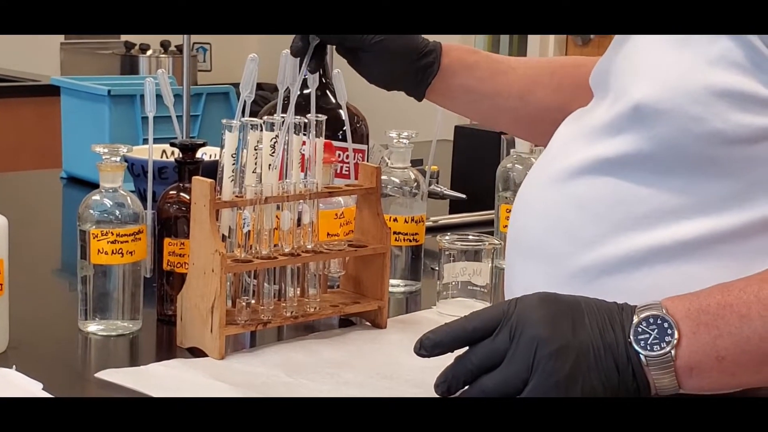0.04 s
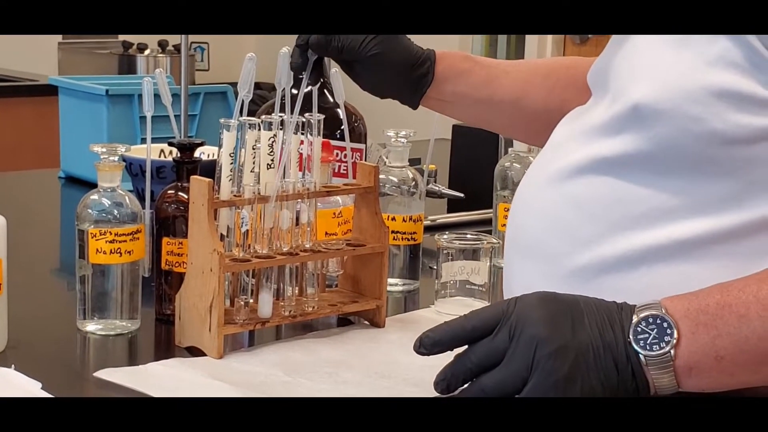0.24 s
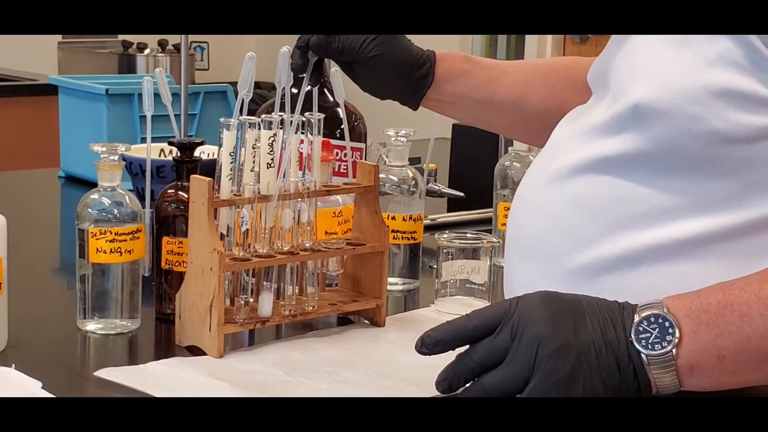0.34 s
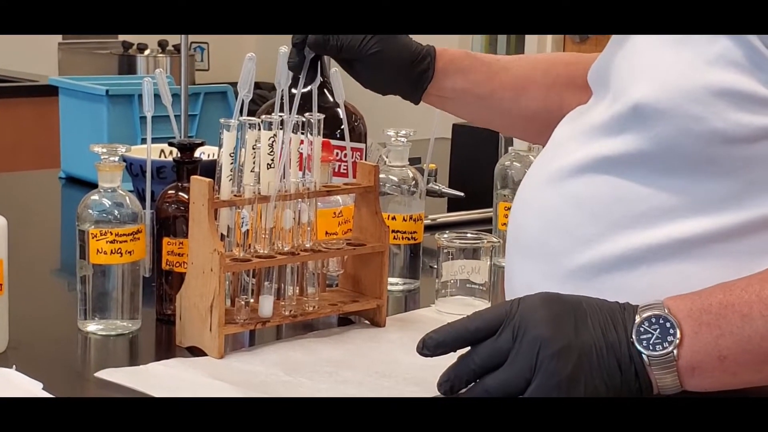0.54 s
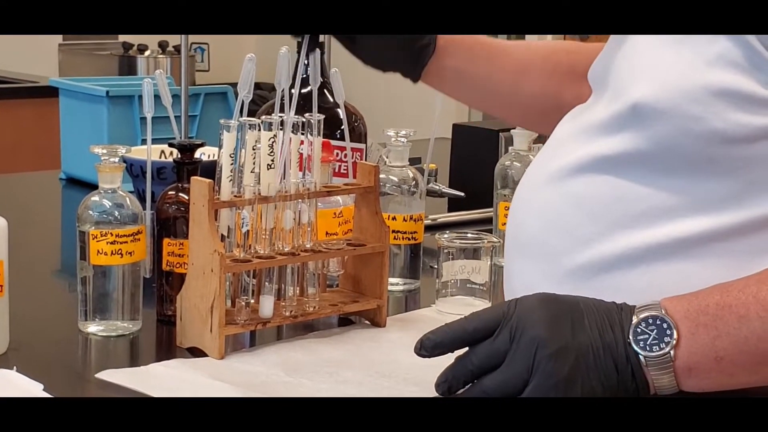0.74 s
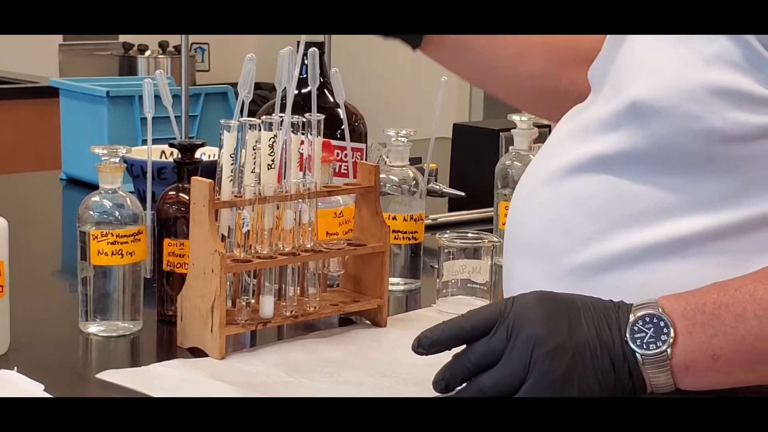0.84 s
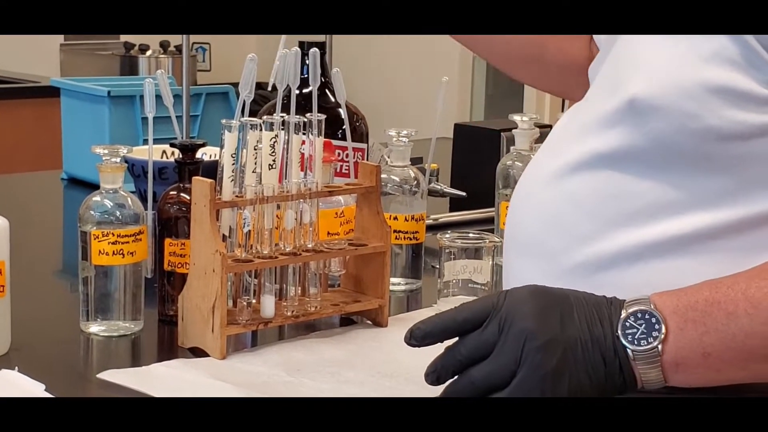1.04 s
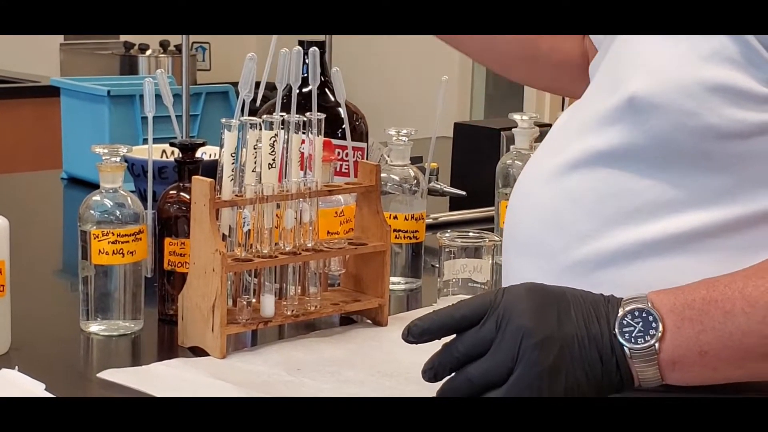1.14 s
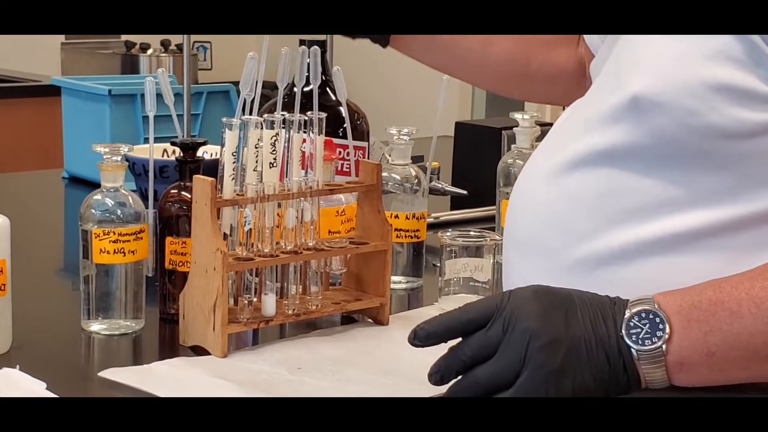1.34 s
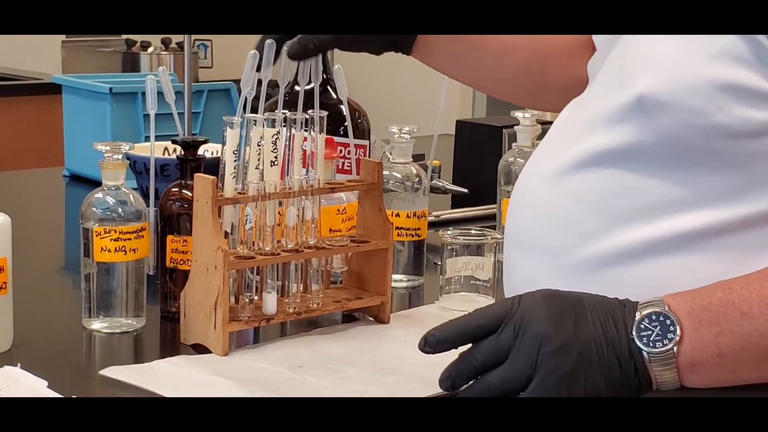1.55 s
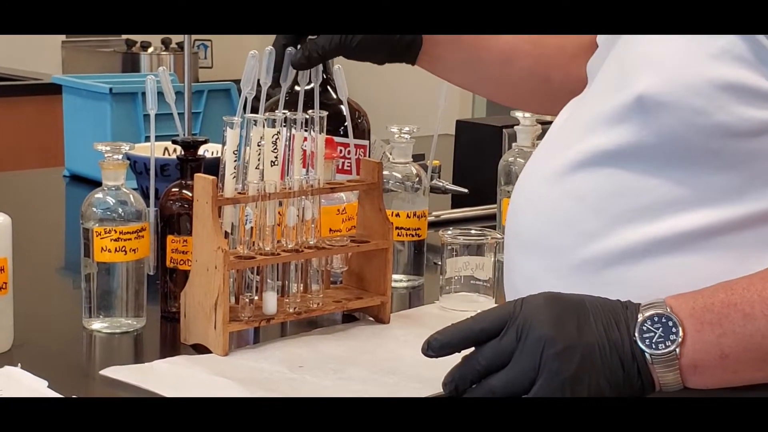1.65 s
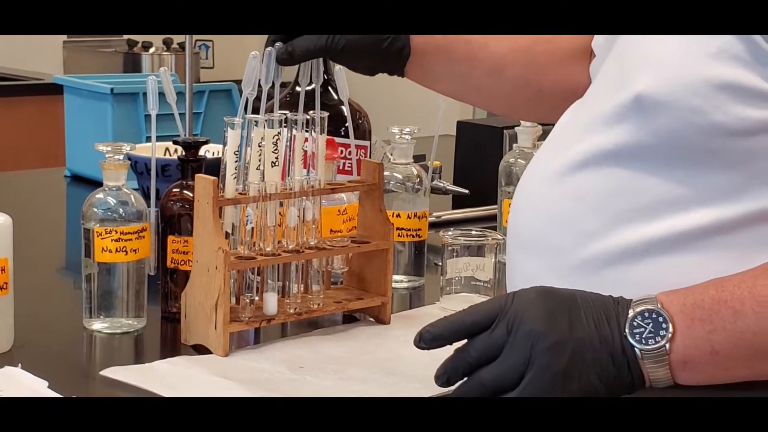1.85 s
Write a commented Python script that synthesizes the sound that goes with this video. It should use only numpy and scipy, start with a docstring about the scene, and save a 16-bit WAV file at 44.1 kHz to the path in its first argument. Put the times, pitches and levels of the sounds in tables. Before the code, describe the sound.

Glass test tubes clink brightly at about 0.3 seconds, just after a plastic pipette ticks on a rim. Faint brushing and taps follow from 0.7 seconds, with a clearer tap near 0.95. Around 1.4 the pipette rattles down a tube, landing at 1.5 with a duller knock against the wooden rack. Low ventilation rumble and faint hiss continue throughout in a small, hard room.

```python
"""A lab bench in a small hard room, over a low ventilation rumble and a faint hiss.
Plastic pipettes are moved between glass test tubes in a wooden rack. One is let go: its stem ticks
on the rim, then two tubes clink brightly. Lifting one out brushes and taps a tube; it rattles down
into another and knocks on the bottom. Each contact is a set of ringing modes plus a crack of noise;
the slides are stick-slip friction on glass."""
import sys
import numpy as np
from scipy import signal
from scipy.fft import rfft, irfft
from scipy.io import wavfile
from scipy.ndimage import uniform_filter1d

SR = 44100
rng = np.random.default_rng(int(sys.argv[2]) if len(sys.argv) > 2 else 0)


def wav_out(sig):
    """Save sig, one row per channel (or a flat mono array), as 16-bit PCM at SR to the path in sys.argv[1]."""
    wavfile.write(sys.argv[1], SR, np.round(np.clip(np.atleast_2d(sig).T, -1, 1) * 32767).astype(np.int16))


N = 83790

# contact noise: bright on glass, dull for a knock, sharp at first touch (frequency [Hz], level [dB])
GLASS_CRACK = [(300, -7), (1200, -12.5), (2500, -11), (3400, -3), (4100, 5.5), (4900, -2.5), (6000, 0),
               (8000, -34.5), (11000, -11.5), (16000, -11)]
KNOCK_CRACK = [(300, 8), (850, 8), (1800, 0), (3200, -10), (4500, -3.5), (6000, -8.5), (9000, -9.5),
               (13500, -18), (16000, -21)]
SNAP = [(1500, -34), (5000, -3), (16000, 0)]


def undb(db):
    """Decibels to gain."""
    return 10 ** (np.asarray(db) / 20)


def curve(points, hz):
    """Read (frequency [Hz], value) points on a log-frequency axis."""
    p = np.array(points, float)
    return np.interp(np.log(np.maximum(hz, 1)), np.log(p[:, 0]), p[:, 1])


def colour(x, points, power=1):
    """EQ by a (frequency [Hz], level [dB]) curve; power scales its depth."""
    gain = undb(curve(points, np.fft.rfftfreq(2 * N, 1 / SR))) ** power
    return irfft(rfft(x, 2 * N) * gain)[..., :N]


def noise(points):
    """Coloured noise of rms 1."""
    x = colour(rng.standard_normal(N), points)
    return x / x.std()


def fade(t, t60):
    """Exponential decay, 60 dB in t60 seconds."""
    return np.exp(-np.log(1000) * t / t60)


def hiss():
    """Each microphone port adds a faint hiss of its own colour."""
    # hiss spectra (frequency [Hz], level [dB])
    left = [(3000, -21), (5900, -7), (6500, 6.5), (7400, -4.5), (9000, -10.5), (16000, -12)]
    right = [(3000, -20), (5200, -5.5), (8500, -7), (16000, -11.5)]
    return np.array([undb(-74) * noise(left), undb(-78.5) * noise(right)])


def ventilation():
    """Duct rumble that swells a little, centred in the bass, with a hum and a faint whine."""
    # air spectrum, its side-to-mid ratio, the band that swells, steady tones (frequency [Hz], level [dB])
    spectrum = [(20, -30.5), (40, -8), (58, 0), (110, -6.5), (145, -1.5), (180, -1), (225, -11),
                (340, -6.5), (520, -18.5), (730, -22), (950, -20), (1400, -27.5), (2000, -28.5),
                (3000, -38.5), (6500, -48.5), (10000, -60), (16000, -64)]
    width = [(60, -15), (150, -16.5), (300, -10), (600, -3.5), (1200, 3.5), (4000, -1.5)]
    rumble_band = [(200, 0), (400, -30)]
    tones = [(62, -59), (139, -61), (1600, -76.5)]
    t, step = np.arange(N) / SR, int(SR / 9)  # nine swell steps a second
    mid, side = noise(spectrum), colour(noise(spectrum), width)
    air = np.array([mid + side, mid - side])
    swell_db = uniform_filter1d(np.repeat(rng.standard_normal(N // step + 1), step), step)[:N]
    air += colour(air, rumble_band) * (undb(swell_db) - 1)
    hum = sum(undb(db) * np.sqrt(2) * np.sin(2 * np.pi * (hz * t + rng.random())) for hz, db in tones)
    return undb(-47.5) * air + hum


def room(x):
    """One clear echo from a hard surface, then a diffuse tail whose treble dies first."""
    # reverb decay (frequency [Hz], t60 [s])
    decays = [(500, .5), (4000, .5), (10000, .26), (15000, .19)]
    build_s, echo_s = 0.0027, 0.012
    t, hz = np.arange(N) / SR, np.fft.rfftfreq(N, 1 / SR)
    spectrum, tail = rfft(rng.standard_normal((2, N))), 0
    for centre_hz, t60 in decays:
        band = curve([(f, f == centre_hz) for f, _ in decays], hz)
        env = fade(t, t60) * (1 - np.exp(-t / build_s))
        tail += irfft(spectrum * band, N) * env / np.sqrt(np.sum(env ** 2))
    echo = np.pad(x, ((0, 0), (int(echo_s * SR), 0)))[:, :N]
    wet = undb(0.5) * signal.fftconvolve(x, tail, axes=1)[:, :N] + undb(-9.5) * echo
    return x + colour(wet, [(5000, 0.0047), (12000, -3.5)])


def slide(resonances, start_s, end_s, db):
    """Dense stick-slip catches excite the damped resonances of the glass."""
    slips_per_s, scatter_db = 450, 4
    t, hz = np.arange(N) / SR, np.fft.rfftfreq(N, 1 / SR)
    catches = rng.random(N) < slips_per_s / SR
    slips = catches * undb(scatter_db * rng.standard_normal(N)) * rng.standard_normal((2, N))
    sliding = (t > start_s) & (t < end_s)
    body = sum(undb(peak_db) / (1 + 2j * (hz - f) / width) ** 2 for f, width, peak_db in resonances)
    scrape = irfft(rfft(slips * sliding) * body, N)
    return undb(db) * scrape / scrape[:, sliding].std()


def strike(hits, modes):
    """Each contact sets the modes ringing; its brightness lifts or dulls those above 7 kHz."""
    attack_s, stereo_spread_rad = 0.00019, 0.9
    out, t = np.zeros((2, N)), np.arange(SR // 2) / SR
    attack = 1 - np.exp(-t / attack_s)
    for time_s, db, bright_db in hits:
        start, ring = int(time_s * SR), 0
        for hz, mode_db, t60 in modes:
            phase = rng.uniform(0, 2 * np.pi) + stereo_spread_rad * rng.standard_normal((2, 1))
            gain = undb(db + mode_db + curve([(7000, 0.015), (14000, bright_db)], hz))
            ring += gain * fade(t, t60) * np.sin(2 * np.pi * hz * t + phase)
        out[:, start:start + len(t)] += (ring * attack)[:, :N - start]
    return out


def crack(hits, spectrum, db, t60):
    """A short, wide burst of contact noise at each hit."""
    t = np.arange(N) / SR
    env = sum(undb(hit_db + db) * (t >= at) * fade(np.abs(t - at), t60) for at, hit_db, _ in hits)
    return env * np.array([noise(spectrum), noise(spectrum)])


def taps(tube_modes):
    """The stem brushes and taps a tube on its way out."""
    # light taps (time [s], level [dB], brightness [dB])
    hits = [(.6591, -58.5, -3), (.7384, -61, -5), (.7583, -65, -7), (.782, -58.5, -11),
            (.9454, -45.5, -1.5), (.971, -55, -3), (.9955, -62, -14)]
    # resonances of the brushed glass (frequency [Hz], width [Hz], level [dB])
    body = [(3820, 740, -6), (10200, 630, -6), (14300, 330, -11)]
    tapping = strike(hits, tube_modes) + crack(hits, GLASS_CRACK, db=-8, t60=0.013)
    return tapping + slide(body, start_s=.737, end_s=.795, db=-68.5)


def rattle():
    """The stem scrapes and chatters down the wall of another tube."""
    # wall contacts (time [s], level [dB], brightness [dB])
    hits = [(1.2492, -65.5, -8), (1.3575, -51.5, -2), (1.3689, -54, -6), (1.3829, -52, -10),
            (1.3905, -52.5, -8), (1.4012, -46.5, -8), (1.433, -59, 1)]
    # ring of that tube (frequency [Hz], level [dB], t60 [s])
    modes = [(4003, 0, 0.028), (9350, -20, 0.03), (12900, -11, .025), (15350, -8, .025)]
    # resonances of the scraped glass (frequency [Hz], width [Hz], level [dB])
    body = [(3200, 1600, 5.5), (4130, 430, -4), (9300, 1800, -3), (15200, 790, -2)]
    chatter = strike(hits, modes) + crack(hits, GLASS_CRACK, db=-9.5, t60=0.018)
    return chatter + slide(body, start_s=1.357, end_s=1.445, db=-69)


def pipette_tick():
    """The plastic stem snaps against the rim as it is let go."""
    # rim contact (time [s], level [dB], brightness [dB])
    hits = [(.2402, -47, 1)]
    # ring of the plastic (frequency [Hz], level [dB], t60 [s])
    modes = [(1860, 4, .035), (1915, -5, .13), (3280, 1, .035), (4380, -3, .02), (5663, -4.5, .034)]
    tick = strike(hits, modes) + crack(hits, KNOCK_CRACK, db=2, t60=.05)
    return tick + crack(hits, SNAP, db=-0.5, t60=.012)


def knock():
    """The pipette lands and knocks the tube against the wooden rack."""
    # double knock (time [s], level [dB], brightness [dB])
    hits = [(1.5178, -44.5, -9), (1.5225, -50.5, -4)]
    # ring of the tube in the rack (frequency [Hz], level [dB], t60 [s])
    modes = [(825, 0, .075), (990, -4, .04), (2446, -5, .04), (2515, -2, .09), (2565, -2.5, .26),
             (3984, 1, .022), (5900, -2, .014), (7596, -13, .02), (8620, -12, .015), (11120, -4, .022),
             (12780, -8, .025), (15300, -7, .02)]
    return strike(hits, modes) + crack(hits, KNOCK_CRACK, db=0, t60=0.056)


def clink(tube_modes):
    """A tube meets its neighbour with a hard snap and bounces; both ring."""
    # impact and bounces (time [s], level [dB], brightness [dB])
    hits = [(.2712, -32.5, -1.5), (.2733, -39.5, -2.5), (.2942, -38, -29)]
    # ring of the neighbour (frequency [Hz], level [dB], t60 [s])
    neighbour_modes = [(3850, -3, .03), (3908, -1, .03), (4172, -2, .026), (4256, -2, .028),
                       (4312, 0, .032), (4410, -8, .025), (5700, -10, .015), (9841, -7, .035),
                       (10240, 0, .043), (10843, -4, .04), (11143, -1, .045), (11597, -2, .045),
                       (12099, 1.5, .042), (13857, 11, .032), (14330, 5, .032)]
    glass = strike(hits, neighbour_modes) + undb(-3.5) * strike(hits, tube_modes)
    contact = crack(hits, GLASS_CRACK, db=-1.5, t60=0.019)
    return glass + contact + crack(hits[:1], SNAP, db=2.5, t60=0.0032)


def scene():
    """The glassware in the room, coloured differently at each microphone port, over air and hiss."""
    # ring of the tube that is clinked, then tapped (frequency [Hz], level [dB], t60 [s])
    first_tube = [(3915, -1, .02), (4030, -7, .018), (9878, -9, .07), (10290, -13, .05),
                  (11660, -1.5, .048), (12540, -19, .03), (14290, -4, .04)]
    # stereo balance (frequency [Hz], left minus right [dB])
    balance = [(4500, 0), (5700, -4), (6700, 9), (7800, 1.5), (10100, -12), (11100, -7), (11800, -1),
               (13000, -2), (13900, 5.5)]
    left, right = room(pipette_tick() + clink(first_tube) + taps(first_tube) + rattle() + knock())
    glassware = np.array([colour(left, balance, 1 / 2), colour(right, balance, -1 / 2)])
    return glassware + ventilation() + hiss()


def record(dry):
    """A steep low-pass cuts the top at 15.9 kHz."""
    return signal.sosfilt(signal.ellip(8, .2, 70, 15900, fs=SR, output="sos"), dry)


dry = scene()
out = record(dry)
wav_out(out)
```